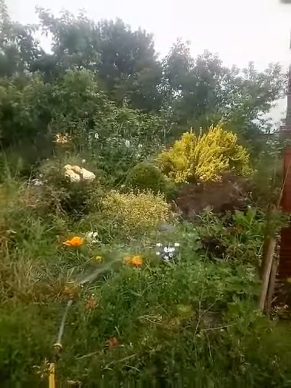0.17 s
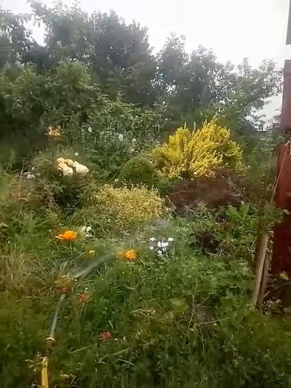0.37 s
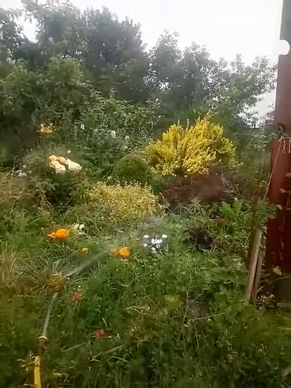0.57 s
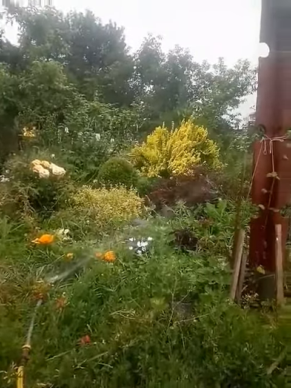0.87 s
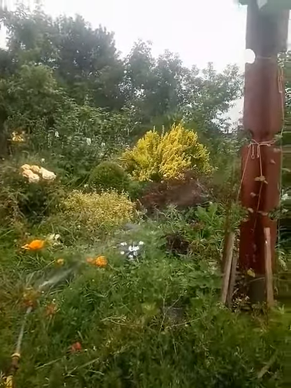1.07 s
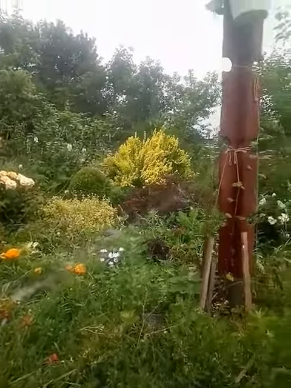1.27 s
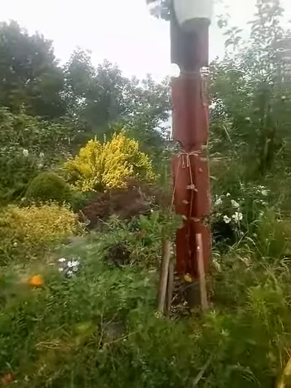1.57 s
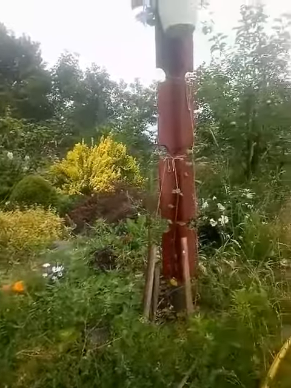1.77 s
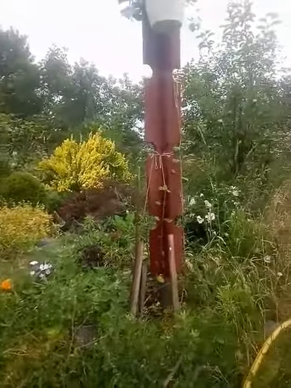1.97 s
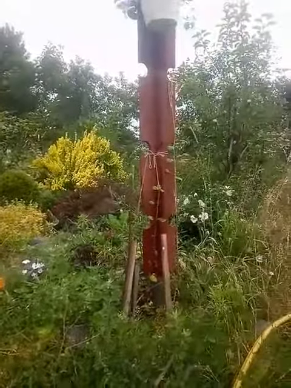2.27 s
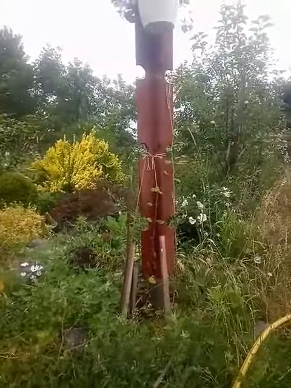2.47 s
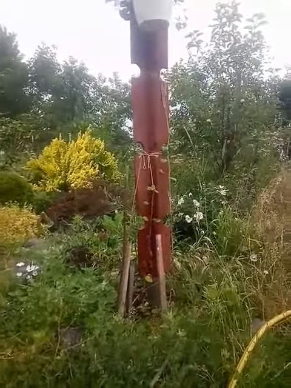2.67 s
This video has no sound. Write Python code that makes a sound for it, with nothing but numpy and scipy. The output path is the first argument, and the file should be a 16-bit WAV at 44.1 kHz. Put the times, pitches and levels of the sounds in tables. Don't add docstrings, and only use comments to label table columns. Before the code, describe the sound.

Garden sprinkler clicking rapidly and evenly, with sharp bursts of torn water and drops pattering on leaves.

```python
import sys
import numpy as np
from scipy import signal
from scipy.fft import rfft, irfft
from scipy.io import wavfile

SR = 44100
rng = np.random.default_rng(int(sys.argv[2]) if len(sys.argv) > 2 else 0)


def int16_out(signal):
    q = np.round(np.clip(np.atleast_2d(signal).T, -1, 1) * 32767)
    wavfile.write(sys.argv[1], SR, q.astype(np.int16))


def magnitude_from_level(level_db):
    exponent = np.asarray(level_db, float) / 20
    return 10 ** exponent


N = 124362

# (time [s], knock level [dB], spray level [dB], time in the jet [s], time to enter it [s])
ARM_BEATS = [(0.0596, -19, -28, 0.035, 0.01), (0.2495, -20, -27, 0.035, 0.009),
             (0.439, -22, -29, 0.035, 0.013), (0.629, -22, -27.5, 0.037, 0.0053),
             (0.8192, -26, -27, 0.035, 0.0071), (1.0084, -24.5, -25.5, 0.034, 0.0043),
             (1.1975, -22, -28, 0.036, 0.0082), (1.39, -22, -26, 0.035, 0.0058),
             (1.579, -22, -31, 0.037, 0.015), (1.769, -20, -27, 0.034, 0.0059),
             (1.9588, -21.5, -29.5, 0.033, 0.011), (2.1491, -21, -29.5, 0.036, 0.0039),
             (2.3382, -37, -26, 0.038, 0.011), (2.5307, -33, -28.5, 0.034, 0.013),
             (2.718, -21.5, -25, 0.032, 0.004)]
SPRAY_ALIKE = 0.54
LEFT_LAG = -6.5


def rms_one(x):
    return x / np.sqrt(np.mean(x ** 2) + 1e-20)


def in_time(rows):
    return np.interp(np.arange(N) / SR, *np.transpose(rows))


def at_hz(points, hz):
    points = np.array(points)
    return np.interp(np.log(hz), np.log(points[:, 0]), points[:, 1])


def colour(x, db_of_hz, lag=0.):
    hz = np.arange(N // 2 + 1) * SR / N + 1e-3
    delay = np.exp(-2j * np.pi * hz * lag / SR)
    return irfft(rfft(x) * magnitude_from_level(db_of_hz(hz)) * delay, N)


def bandpass(x, low_hz, high_hz):
    return signal.sosfilt(signal.butter(2, [low_hz, high_hz], "band", fs=SR, output="sos"), x)


def highpass(x, hz):
    return signal.sosfilt(signal.butter(2, hz, "high", fs=SR, output="sos"), x)


def fading(clicks, seconds):
    return signal.lfilter([1], [1, -np.exp(-1 / (seconds * SR))], clicks)


def drift(rate):
    r = np.exp(-80 * np.pi * rate / SR)
    slow = signal.lfilter([1], [1, -2 * r, r * r], rng.standard_normal(N // 40 + 2002))[2000:]
    return np.interp(np.arange(N) / 40, np.arange(len(slow)), rms_one(slow - slow.mean()))


def ring(clicks, hz, t60):
    r, w = magnitude_from_level(-60 / (t60 * SR)), 2 * np.pi * hz / SR
    return signal.lfilter([0, np.sin(w)], [1, -2 * r * np.cos(w), r * r], clicks + 1e-18)


def grains(rate, spread_db):
    sizes = magnitude_from_level(spread_db * np.minimum(rng.exponential(1, (2, N)), 5))
    sizes = sizes * rng.choice([-1, 1], (2, N))
    return sizes * (rng.random((2, N)) < rate / SR)


def pair(x, alike):
    alike = np.clip(alike, 0, 1)
    return np.sqrt(1 + alike) * x[0] + np.sqrt(1 - alike) * x[1] * [[1], [-1]]


def banded_noise(spectrum, low_hz, count, shared_db, own_db, rate):
    # (frequency [Hz], likeness [0-1])
    likeness = [(30, 0.1), (130, 0.6), (300, 0.79), (600, 1), (1200, 0.089), (2500, 0.11), (6000, 0.014),
                (16000, 0.018)]
    out, together, white = 0, drift(rate), rng.standard_normal((2, 2, N))
    for k in range(count):
        low, high = low_hz * 2 ** (k / 3), min(low_hz * 2 ** ((k + 1) / 3), SR * .45)
        band = bandpass(white[k % 2], low, high)
        flicker = magnitude_from_level(shared_db * together + own_db * drift(rate))
        out = out + flicker * pair(band, at_hz(likeness, low))
    return rms_one(colour(out, lambda hz: at_hz(spectrum, hz)))


def jet_hiss(wet_db):
    # (frequency [Hz], weight [dB])
    hiss_colour = [(350, -17.5), (600, -6.5), (2000, -6.5), (4000, -0.5), (6400, -1.5), (8000, -9),
                   (13000, -11), (16000, -1.5)]
    dip_hz, dip_width_hz, dip_db = 806, 160, -12.5
    noise = banded_noise(hiss_colour, 294.8, count=18, shared_db=1.23, own_db=2.8, rate=23.3)
    hiss = magnitude_from_level(-42 + 0.57 * wet_db) * noise
    return colour(hiss, lambda hz: dip_db / (1 + (2 * (hz - dip_hz) / dip_width_hz) ** 2))


def patter(wet_db):
    drops_per_s, level_db = 630, -59
    drops = grains(drops_per_s * magnitude_from_level(wet_db + 4.6 * drift(11)), spread_db=3.0)
    pitches, dealt = np.geomspace(600, 9000, 14), rng.integers(0, 14, (2, N))
    rings = sum(ring(drops * (dealt == k), hz, 3.4 / hz) for k, hz in enumerate(pitches))
    return magnitude_from_level(level_db + 0.14 * wet_db) * rms_one(highpass(pair(rings, 0.44), 500))


def wind():
    # (time [s], level [dB], left over right [dB])
    gusts = [(0.0, -50.5, 4), (0.11, -61.5, 0), (0.23, -54, 0), (0.34, -58.5, -3), (0.38, -50, 17),
             (0.42, -59.5, 13), (0.71, -51, 8.5), (0.75, -59.5, -5), (1.07, -62, 11.5), (1.11, -57, 5.5),
             (1.59, -60.5, 2.5), (1.65, -52, 3.5), (1.73, -58.5, -2), (1.88, -60.5, 9), (1.92, -60.5, 2.5),
             (2.54, -62, 4), (2.65, -52.5, 3), (2.82, -62.5, 5)]
    # (frequency [Hz], weight [dB])
    wind_colour = [(12, -39), (28, -13), (59, 4), (97, 2.5), (317, -9), (365, -21), (420, -17), (550, -42),
                   (920, -120)]
    bump_s, bump_hz, bump_db, bump_t60_s, bump_pan_db = .3695, 100, -41, 0.06, 9
    bump = np.zeros(N)
    bump[int(bump_s * SR)] = -magnitude_from_level(bump_db)
    bump = ring(bump, bump_hz, bump_t60_s)
    soft = signal.sosfilt(signal.butter(6, 170, fs=SR, output="sos"), bump)
    s, db, pan_db = np.transpose(gusts)
    gain = magnitude_from_level(in_time(np.c_[s, db]) + in_time(np.c_[s, pan_db]) * [[.5], [-.5]])
    rumble = banded_noise(wind_colour, 20.32, count=13, shared_db=0.5, own_db=2.5, rate=7.0)
    return gain * rumble + soft * magnitude_from_level([[bump_pan_db], [-bump_pan_db]])


def cup(x, hz):
    width_hz = 1570
    r = np.exp(-np.pi * width_hz / SR)
    b, a = [1, 0.0047, -1.52], [1, -2 * r * np.cos(2 * np.pi * hz / SR), r * r]
    return rms_one(signal.lfilter(b, a, signal.lfilter(b, a, x)))


def spray():
    # (share of the full sink [0-1], note [dB], overflow [dB], gurgle [dB])
    cupfuls = [(0.63, 1, 0, -24.5), (0.73, -2.5, 1, -20.5), (0.45, -5, -11, -24), (0.4, -4.5, -17, -25),
               (0.54, -2.5, -14, -27), (.8, -1, -2, -24), (0.64, 2, 4, -23), (0.63, -1, 3.5, -20.5),
               (0.77, 0, 4, -34), (0.85, -1, 3, -28), (0.8, 1, 3, -29), (0.96, 2, 3.5, -23),
               (0.96, -2.5, -5, -20), (0.85, -6.5, 5.5, -43), (0.93, -6.5, 5, -15)]
    # (frequency [Hz], weight [dB])
    spray_colour = [(300, -25), (2000, -15.5), (3800, -6), (5500, 3.5), (8500, -1), (11000, -1),
                    (13500, -9), (16000, 0.5)]
    # (time [s], peak level [dB])
    slug_rows = [(.0612, -22), (.2515, -24), (.264, -21), (.276, -22), (.34, -36), (.4395, -24),
                 (.4635, -23), (.6385, -24), (.6605, -24), (.8515, -25), (1.0118, -24), (1.0156, -21),
                 (1.023, -16), (1.0275, -17), (1.0365, -12), (1.2265, -23), (1.4145, -21), (1.6045, -24),
                 (1.773, -21), (1.79, -20), (1.7945, -16), (1.8555, -29), (1.927, -33), (1.9845, -24),
                 (2.178, -19), (2.331, -30), (2.3405, -23), (2.349, -23), (2.3635, -22), (2.3715, -26),
                 (2.403, -29), (2.409, -30), (2.5145, -27), (2.5225, -29), (2.531, -21), (2.5445, -26),
                 (2.5565, -23), (2.7285, -23), (2.7415, -20), (2.7485, -21)]
    leave_s, mist_s, mist_db = 0.0018, 0.05, -14.5
    empty_hz, full_hz, sink_bend = 7066, 5150, 1.47
    overflow_at, overflow_width = 0.76, 0.21
    tears_per_s, notes_db, torn_db, thinning_db = 16000, -9, -4, -5
    slug_s, slug_db = .0012, -8

    t, gain, cupful = np.arange(N) / SR, np.zeros(N), np.zeros((5, N))
    for (s, _, db, length, enter), row in zip(ARM_BEATS, cupfuls):
        after = np.maximum(t - s - length, 0)
        entering = np.clip((t - s) / enter + 1, 0, 1) ** 1.8
        leaving = np.exp(-after / leave_s) + magnitude_from_level(mist_db) * np.exp(-after / mist_s)
        gain += magnitude_from_level(db) * entering * leaving
        now = t > s - enter
        cupful[0, now] = np.clip((t[now] - s) / length, 0, 1)
        cupful[1:, now] = np.c_[list(row)]
    filled, sink, note_db, overflow_db, gurgle_db = cupful

    tears = pair(grains(tears_per_s * magnitude_from_level(2.0 * drift(150)), spread_db=2.0), SPRAY_ALIKE)
    steps, sunk = np.linspace(0, 1, 7), np.clip(sink, 0, 1) * filled ** sink_bend
    bank = [cup(tears, empty_hz * (full_hz / empty_hz) ** step) for step in steps]
    note = sum(np.clip(1 - 6 * abs(sunk - step), 0, 1) * one for step, one in zip(steps, bank))
    brim = np.exp(-((filled - overflow_at) / overflow_width) ** 2)
    notes = magnitude_from_level(note_db + 2.6 * drift(58)) * note
    notes = notes + magnitude_from_level(overflow_db + 2.5 * drift(86)) * brim * bank[-1]
    gurgle = magnitude_from_level(gurgle_db) * brim * rms_one(bandpass(tears, 906, 4060))
    torn = rms_one(colour(tears, lambda hz: at_hz(spray_colour, hz)))

    slugs = np.zeros(N)
    for s, db in slug_rows:
        slugs[int(s * SR)] = magnitude_from_level(db + slug_db)
    slugs = fading(slugs, slug_s) * (note + 0.4 * torn)
    water = magnitude_from_level(notes_db) * notes + gurgle + magnitude_from_level(torn_db) * torn
    return slugs + gain * magnitude_from_level(thinning_db * filled ** 4) * water


def knocks():
    # (level [dB], t60 [s])
    body_modes = [(-28.5, 0.025), (-28, 0.017), (-9, 0.0095), (-9, 0.086), (0, 0.012), (1.5, 0.011),
                  (-4, 0.013), (3, 0.01), (-9.5, 0.067), (-5, 0.03), (3, 0.0086), (-12, 0.011), (-3, 0.029),
                  (-9, 0.011)]
    body_hz = [1250, 1850, 2650, 3250, 4250, 5300, 5850, 6680, 7240, 8180, 9850, 11500, 12590, 14000]
    knock_db, rebound_s, rebound_db, crack_db, crack_s = -7, 0.0014, 1.5, -2.5, 0.0018
    s, db = np.transpose(ARM_BEATS)[:2]
    at, out, burst = (s * SR).astype(int), np.zeros((2, N)), np.zeros(N)
    luck = rng.normal(0, 1, (len(s), len(body_modes), 4))
    for k, (hz, (level_db, t60)) in enumerate(zip(body_hz, body_modes)):
        clicks = np.zeros((2, N))
        hit_db = db + level_db + knock_db
        clicks[:, at] = magnitude_from_level(hit_db + 1.8 * luck[:, k, :2].T)
        clicks[:, at + int(rebound_s * SR)] = magnitude_from_level(hit_db + rebound_db + 2.4 * luck[:, k, 2:].T)
        out += ring(clicks, hz, t60) * (-1) ** k
    burst[at] = magnitude_from_level(db + crack_db)
    crack = rms_one(np.diff(pair(rng.standard_normal((2, N + 1)), SPRAY_ALIKE)))
    return out + fading(burst, crack_s) * crack


def leaves():
    # (time [s], level [dB], note [Hz])
    leaf_rows = [(.352, -44, 2740), (.66, -45, 1210), (.906, -52.5, 670), (.956, -50, 3340),
                 (1.022, -45, 583), (1.337, -45, 1850), (1.41, -45.5, 684), (1.93, -46.5, 1490),
                 (1.991, -43, 2860), (2.178, -40.5, 2960), (2.303, -43.5, 1470), (2.33, -44, 1120),
                 (2.36, -46, 800), (2.373, -44, 1200), (2.389, -42, 2720), (2.402, -47.5, 860),
                 (2.444, -45, 1750), (2.498, -40.5, 790), (2.5, -41, 2300), (2.504, -45, 1510),
                 (2.56, -44, 3420), (2.72, -43, 1280), (2.767, -45, 1500)]
    t60_s, at = 0.043, np.arange(N)
    notes = sum(ring(magnitude_from_level(db) * (at == int(s * SR)), hz, t60_s) for s, db, hz in leaf_rows)
    return np.array([colour(notes, np.zeros_like, LEFT_LAG), notes])


def splats():
    # (time [s], slap peak [dB], left over right [dB], spit peak [dB])
    fat_drops = [(0.353, -37, 3, -53), (0.579, -41, 4, -48), (0.779, -53, -0.5, -39), (0.956, -38, -4, -48),
                 (1.337, -37, -4, -55), (1.381, -50, 4, -37), (1.859, -53, -5, -35), (2.014, -38, -4, -47),
                 (2.303, -49, -2, -57), (2.328, -32, 3, -37), (2.402, -33.5, -7, -32), (2.498, -31, 4, -44),
                 (2.502, -42, 6, -44), (2.514, -58, -7, -35.5), (2.521, -56, -3, -38),
                 (2.705, -32.5, 0, -52), (2.768, -33, 1, -52)]
    fade_s, low_hz, high_hz, slap_db, extra_spit_db = 0.0081, 690, 4830, -6, -3
    burst = np.zeros((2, 2, N))
    for s, db, pan_db, spit_db in fat_drops:
        peaks_db = np.array([[db + slap_db], [spit_db + extra_spit_db]])
        burst[:, :, int(s * SR)] = magnitude_from_level(peaks_db + pan_db * np.array([.5, -.5]))
    slap, spit = fading(burst, fade_s)
    bits = pair(grains(7000, spread_db=3.0), 0.52)
    return slap * rms_one(bandpass(bits, low_hz, high_hz)) + spit * rms_one(highpass(bits, high_hz))


def scene():
    # (time [s], level [dB])
    wetting = [
        (0.0, -55.5),
        (0.99, -56),
        (1.63, -51.5),
        (2.42, -51.5),
        (2.82, -47.5),
    ]
    wet_db = in_time(wetting)
    wet_db = wet_db - wet_db.mean()
    left, right = spray() + knocks()
    sprinkler = np.array([colour(left, np.zeros_like, LEFT_LAG), right])
    return sprinkler + jet_hiss(wet_db) + patter(wet_db) + splats() + leaves() + wind()


def low_pass(x):
    return signal.sosfilt(signal.butter(12, 16880, fs=SR, output="sos"), x)


def record(dry):
    # (frequency [Hz], difference [dB])
    port_tilt = [(130, -2.5), (500, -0.8), (3000, 1.5), (6000, 2), (9000, 6.5), (12500, 15), (15000, 14.5)]
    port_hz, port_width_hz, port_db, cutoff_hz = 15140, 890, 9.5, 15940

    def port(hz, side):
        peak = 1 + (magnitude_from_level(port_db) - 1) / (1 + (2 * (hz - port_hz) / port_width_hz) ** 4)
        return 20 * np.log10(peak) + side * at_hz(port_tilt, hz)

    left = colour(dry[0], lambda hz: port(hz, 0.44))
    right = colour(dry[1], lambda hz: port(hz, -0.44))
    top_cut = signal.cheby2(12, 50, cutoff_hz, fs=SR, output="sos")
    return low_pass(signal.sosfilt(top_cut, np.array([left, right])))


dry = scene()
out = record(dry)
int16_out(out)
```